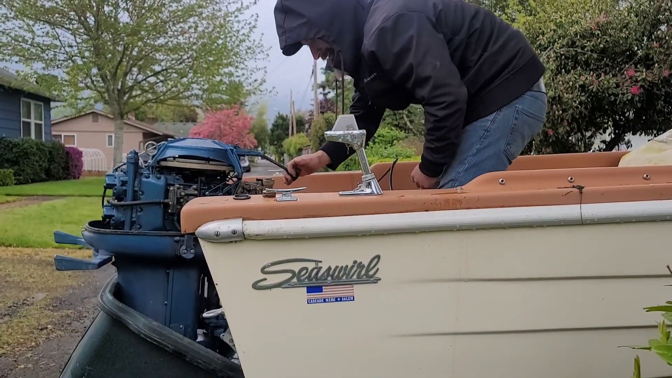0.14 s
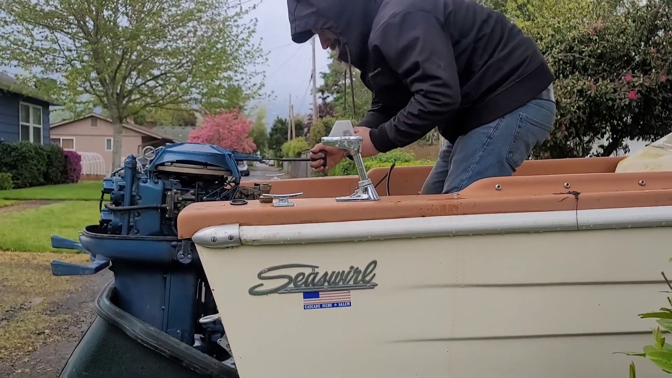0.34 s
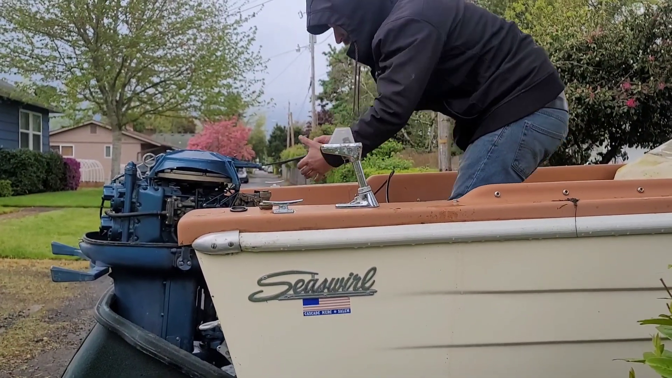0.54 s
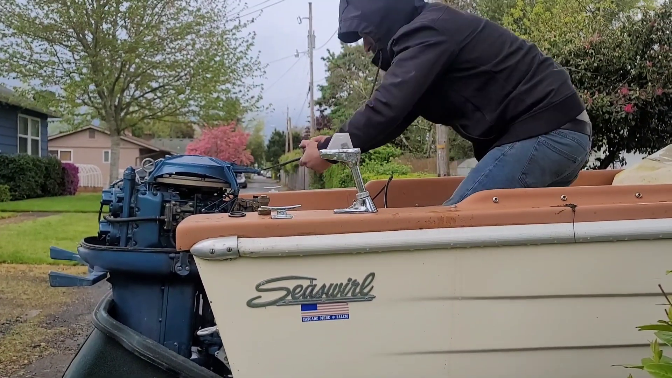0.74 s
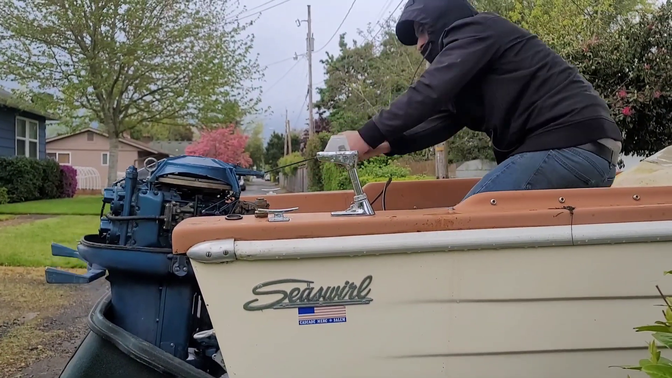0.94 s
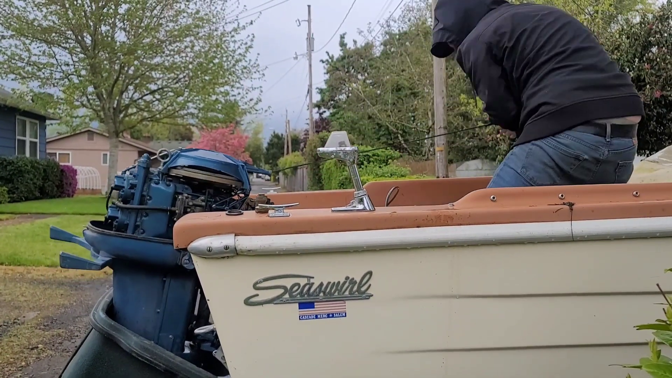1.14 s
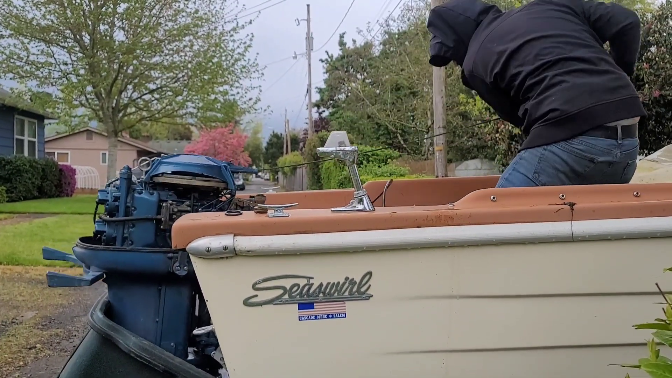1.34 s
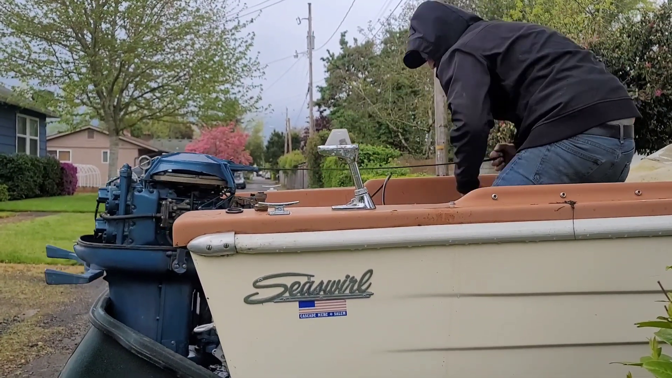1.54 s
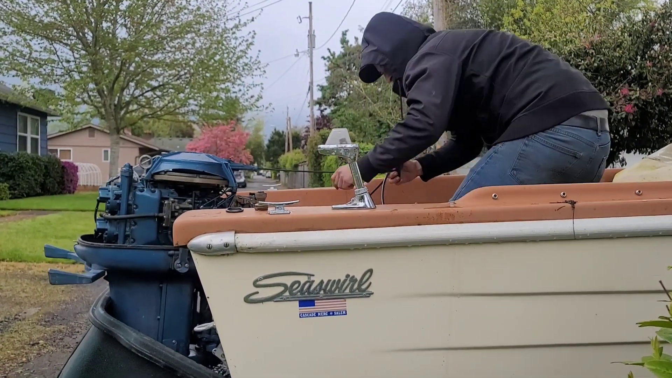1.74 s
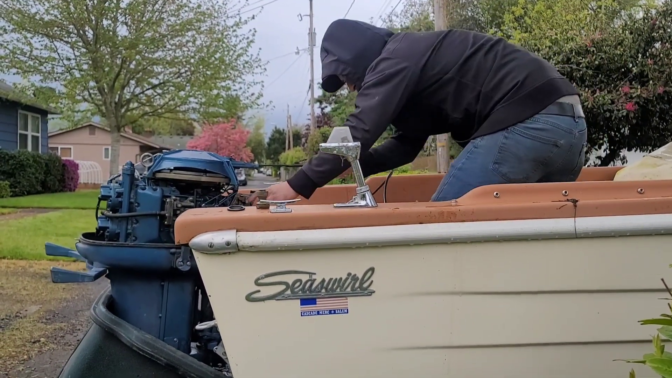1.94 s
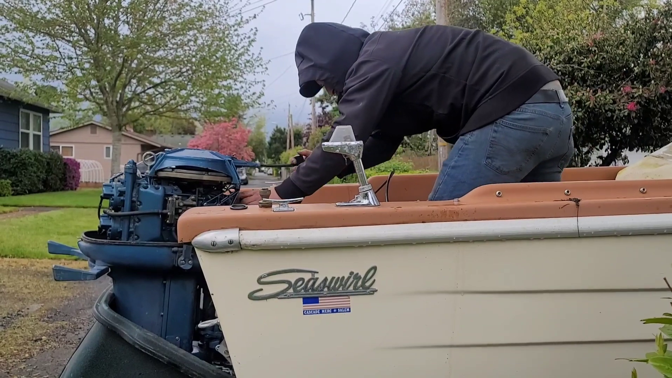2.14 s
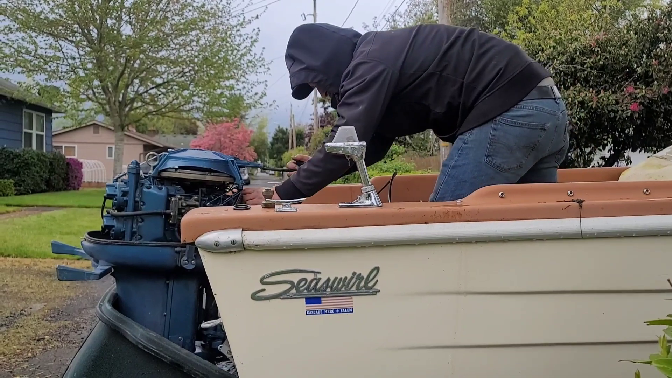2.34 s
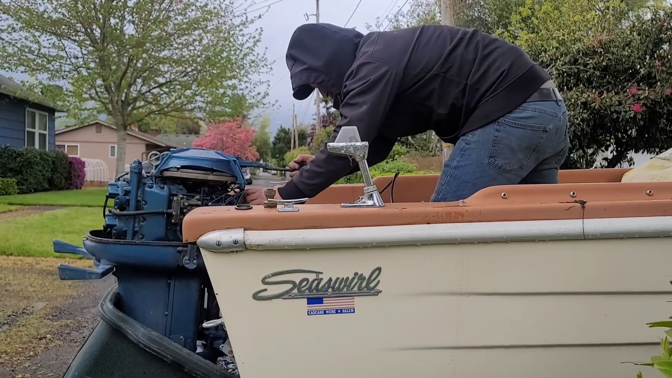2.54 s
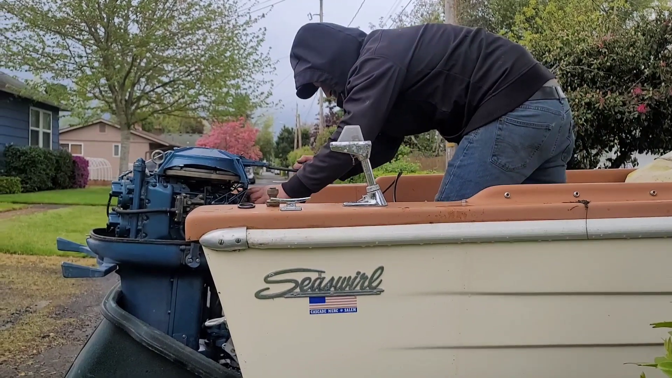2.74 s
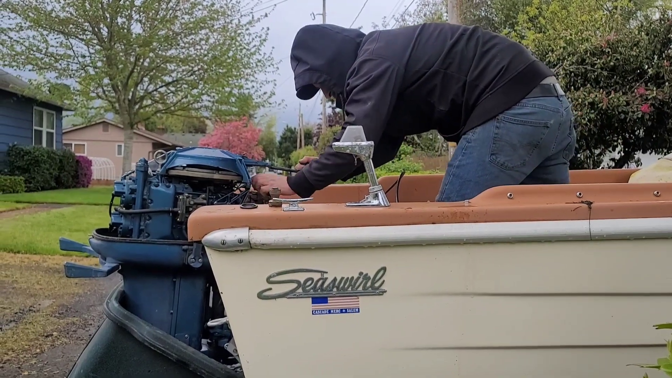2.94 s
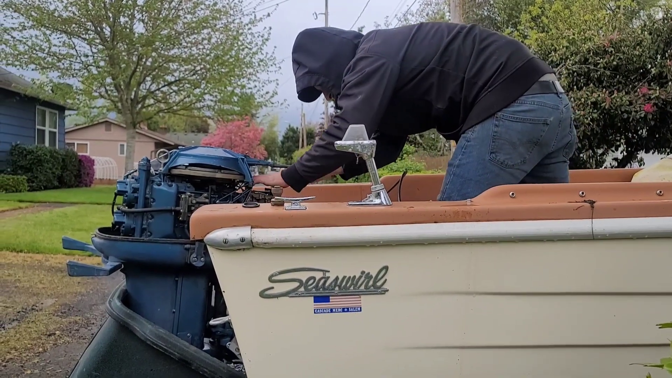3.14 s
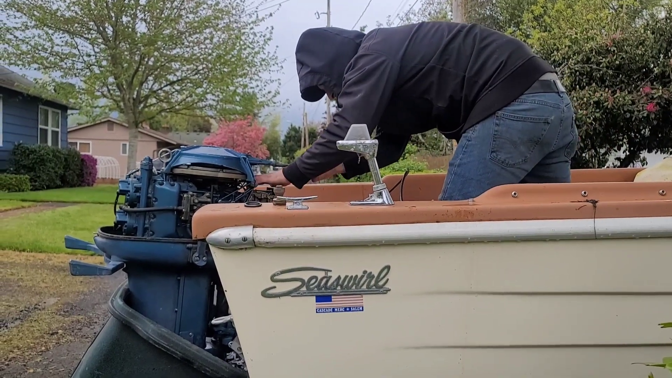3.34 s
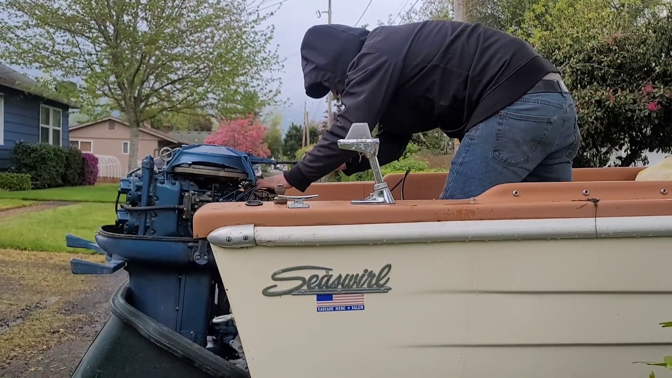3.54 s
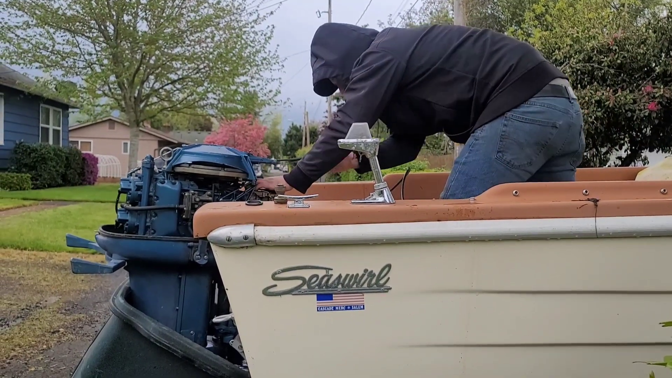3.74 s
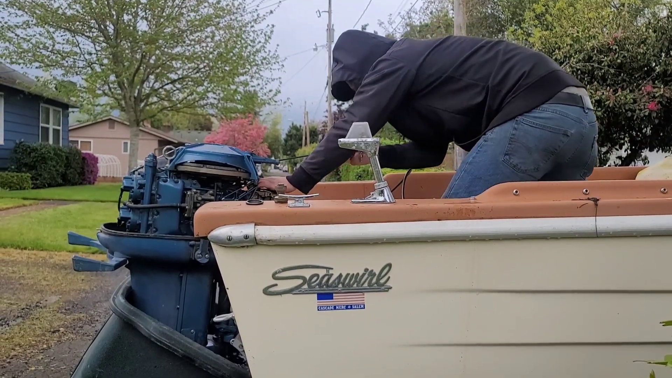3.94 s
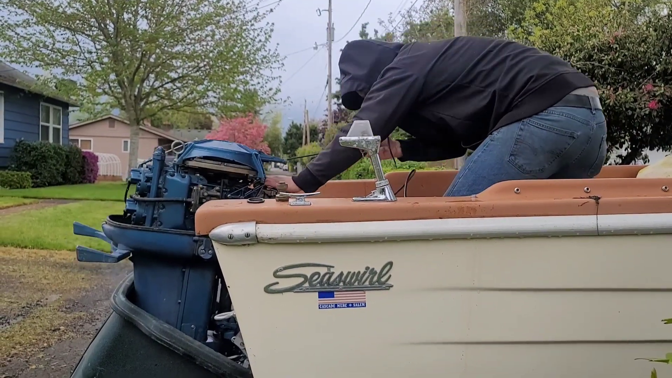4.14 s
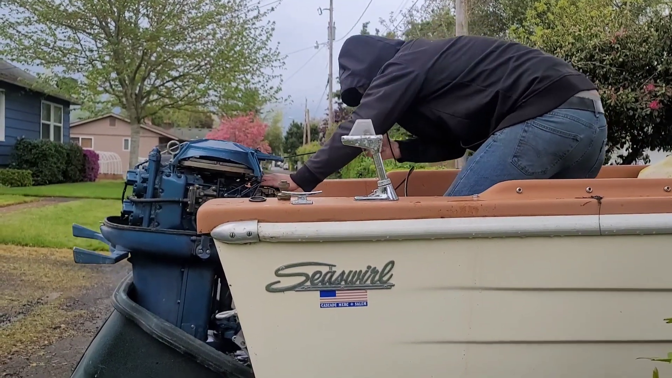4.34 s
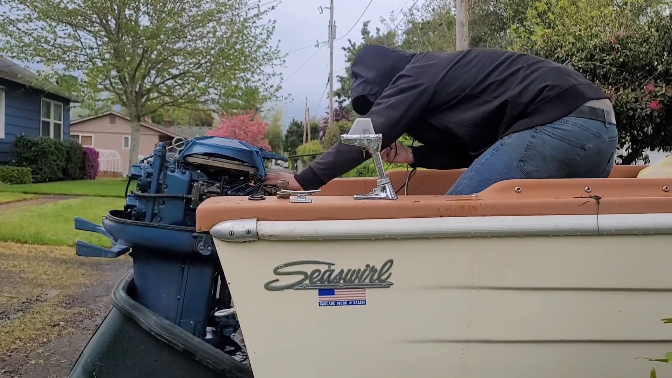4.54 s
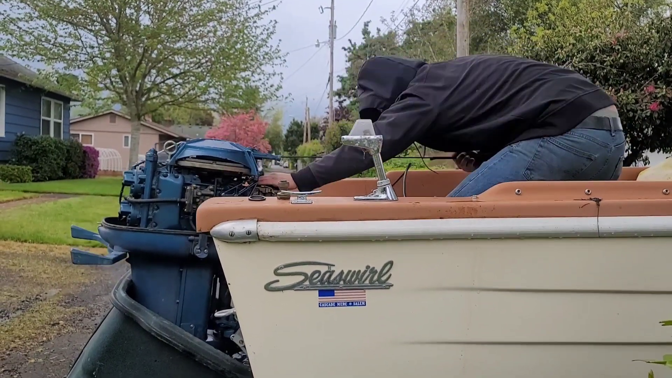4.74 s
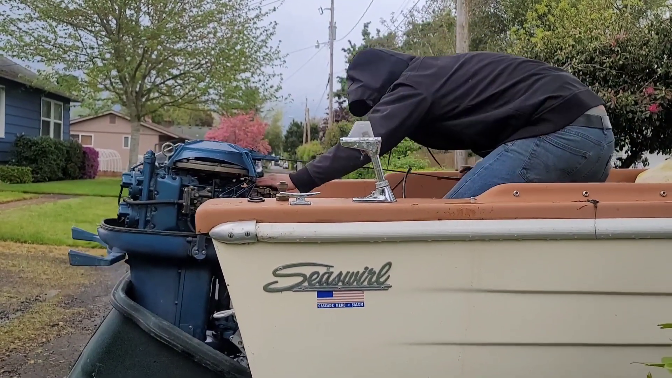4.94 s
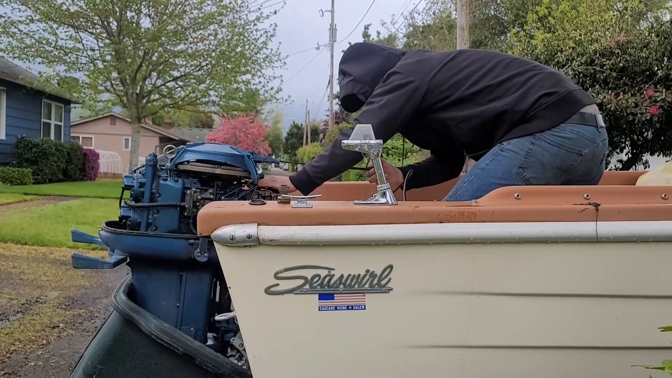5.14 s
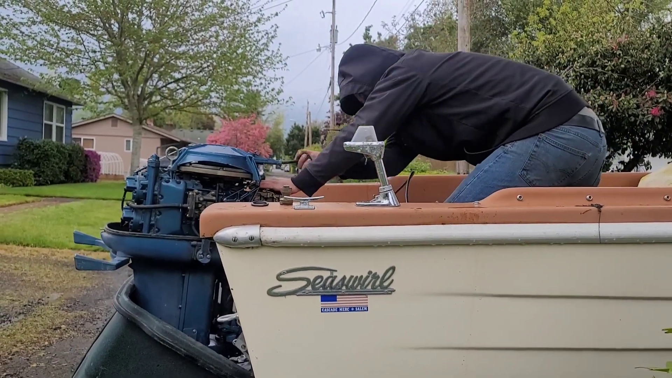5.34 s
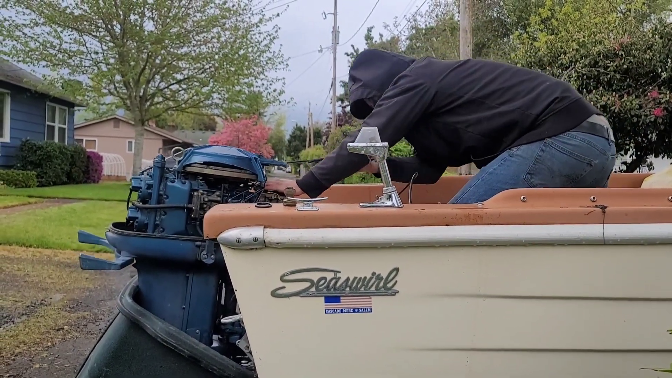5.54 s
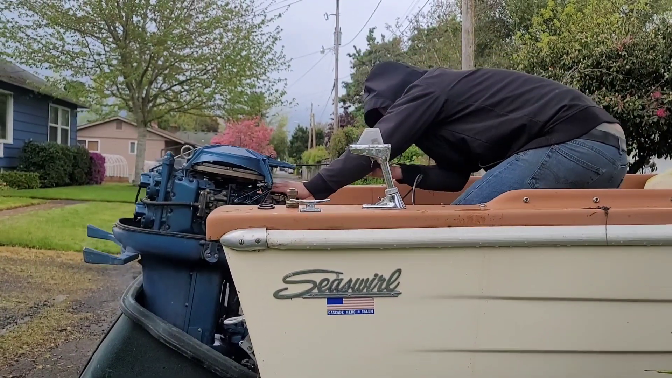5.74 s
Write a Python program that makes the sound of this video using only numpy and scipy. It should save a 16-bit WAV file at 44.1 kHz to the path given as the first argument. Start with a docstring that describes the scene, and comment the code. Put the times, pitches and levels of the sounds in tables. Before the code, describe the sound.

Close by in a quiet yard, an outboard motor is cranked once by its pull cord, rasping and rattling to a stop without firing. Scattered clicks, a tiny squeak, soft jacket rustle and a hollow clunk follow as it is handled. Near the end the starter scrapes again, more softly, with a few more metal knocks. A far bird chirps now and then over a faint traffic rumble.

```python
"""A front yard, with an old outboard motor on a boat. The starter cord is pulled hard once, the flywheel
coasts and the handle knocks home; later the starter is turned a little by hand. Each blow and scrape
excites the normal modes of the hollow housing and bare castings; the engine pumps air and shakes the
hull. Fittings tick and squeak, a jacket rustles, a distant bird sings, wind blows, and far traffic
rumbles and drones."""
import sys
import numpy as np
from scipy import signal
from scipy.fft import rfft, irfft, next_fast_len
from scipy.io import wavfile

SR = 44100
rng = np.random.default_rng(int(sys.argv[2]) if len(sys.argv) > 2 else 0)


def waveform_to_disk(signal):
    """Save audio, clipped to [-1, 1], as 16-bit WAV at the path in sys.argv[1]."""
    frames = np.transpose(np.atleast_2d(signal))
    scaled = np.clip(frames, -1, 1) * 32767
    samples = np.round(scaled).astype(np.int16)
    wavfile.write(sys.argv[1], SR, samples)


N = 254456
PAD = next_fast_len(N)
HZ = np.fft.rfftfreq(PAD, 1 / SR) + 1e-3
TIME = np.arange(N) / SR

# The hull's boom. Each row: frequency in Hz, level in dB, time to decay by 60 dB in seconds.
HULL_MODES = [(81, 0.94, 0.11)]


def amp(db):
    """Amplitude ratio: tenfold for every 20 dB."""
    return 10 ** (np.asarray(db) / 20)


def unit_rms(x):
    """Normalisation to unit mean power."""
    return x / np.sqrt(np.mean(x ** 2) + 1e-20)


def add(track, start, piece):
    """Superposition: a piece joins the track at a start in seconds."""
    i = round(start * SR)
    track[i:i + len(piece)] += piece[:N - i]


def envelope(points):
    """Amplitude envelope, linear in dB between its points and silent outside them."""
    times, levels = np.transpose(points)
    return amp(np.interp(TIME, times, levels, -200, -200))


def swells(rows, rise_db_s, fall_db_s):
    """Exponential growth and decay on either side of each held level."""
    return sum(amp(db - rise_db_s * np.maximum(start - TIME, 0)
                   - fall_db_s * np.maximum(TIME - start - hold, 0)) for start, hold, db in rows)


def drift(per_s):
    """Random modulation: straight lines between Gaussian values."""
    knots = rng.standard_normal(int(N / SR * per_s) + 2)
    return np.interp(np.linspace(0, len(knots) - 1, N), np.arange(len(knots)), knots)


def grains(per_s, spread_db):
    """Shot noise: random clicks of uneven size, at unit rms."""
    sizes = amp(spread_db * np.minimum(rng.exponential(1, N), 4)) * rng.choice([-1, 1], N)
    return unit_rms(sizes * (rng.random(N) < per_s / SR))


def band_noise(band_hz, shape):
    """Band-limited Gaussian noise at unit rms."""
    band = signal.butter(2, band_hz, "band", fs=SR, output="sos")
    return unit_rms(signal.sosfilt(band, rng.standard_normal(shape)))


def at_hz(points):
    """Interpolation of a table along a logarithmic frequency axis."""
    hz, values = np.transpose(points)
    return np.interp(np.log(HZ), np.log(hz), values)


def colour(x, spectrum):
    """Spectral shaping, with unit power gain for white noise."""
    return irfft(rfft(x, PAD) * unit_rms(amp(at_hz(spectrum))), PAD)[..., :N]


def flicker(x, spread_db, per_s):
    """Independent amplitude modulation of the octaves from 1 to 16 kHz keeps the timbre shifting."""
    spectrum, octave = rfft(x, PAD), np.log2(HZ / 1000)
    bands = [irfft(spectrum * np.clip(1 - abs(octave - k), 0, 1), PAD)[:N] for k in range(5)]
    return sum(band * amp(spread_db * drift(per_s)) for band in bands)


def ring(force, modes):
    """Modal superposition: damped resonators in parallel, neighbours opposite in sign."""
    out = 0
    for k, (hz, db, t60) in enumerate(modes):
        radius, angle = amp(-60 / (t60 * SR)), 2 * np.pi * hz / SR
        poles = [1, -2 * radius * np.cos(angle), radius ** 2]
        out = out + (-1) ** k * amp(db) * signal.lfilter([0, np.sin(angle)], poles, force + 1e-18)
    return out


def traffic():
    """Far traffic as low-frequency noise under slow amplitude modulation."""
    # Each row: time in seconds, level in dB.
    levels = [(0, -44.5), (2, -42.5), (5.77, -41.5)]
    # Each row: frequency in Hz, relative spectral density in dB.
    spectrum = [(15, -37.5), (40, -13), (80, 6.5), (105, -8), (140, -6), (190, -20.5), (300, -62)]
    return envelope(levels) * amp(0.18 * drift(4.8)) * colour(rng.standard_normal(N), spectrum)


def city_hush():
    """The far city as stationary noise, in two uncorrelated signals."""
    # Each row: frequency in Hz, relative spectral density in dB.
    spectrum = [(120, -34.5), (200, -10.5), (450, -7), (1000, -9.5), (2400, -25), (4700, -33),
                (16000, -109)]
    return amp(-51.5) * colour(rng.standard_normal((2, N)), spectrum)


def wind():
    """Turbulence: low pressure fluctuations, uncorrelated between left and right."""
    # Each row: time in seconds, level in dB.
    levels = [(0, -59), (1.2, -61), (1.7, -52.5), (4.7, -39), (5.77, -48)]
    return envelope(levels) * band_noise([20, 90], (2, N))


def bird():
    """Gliding whistles, made hoarse by random frequency and amplitude modulation."""
    # Each row: start and length in seconds, first, middle and last pitch in Hz, level in dB.
    notes = [(0, 0.016, 3220, 3110, 2770, -45.5), (0.122, 0.031, 3280, 3370, 3000, -56),
             (0.723, 0.061, 4590, 3900, 3210, -53), (0.776, 0.067, 3155, 2990, 2340, -49.5),
             (0.925, 0.034, 3500, 3980, 3920, -59), (0.994, 0.049, 2450, 3000, 3880, -51),
             (2.341, 0.1, 3300, 4090, 3060, -53.5), (2.755, 0.039, 2900, 3920, 5130, -51),
             (3.473, 0.056, 2430, 2960, 3550, -56), (3.68, 0.038, 4310, 4330, 3860, -53),
             (3.693, 0.08, 3590, 3234, 2720, -45.5), (4.48, 0.08, 3260, 3210, 2970, -57),
             (5.164, 0.046, 3240, 3090, 2830, -46), (5.692, 0.035, 4920, 4080, 3870, -53)]
    out, waver = np.zeros(N), 1 + .03 * drift(400)
    for start, length, first_hz, middle_hz, last_hz, db in notes:
        progress = np.linspace(0, 1, round(length * SR))
        glide = np.polyfit([0, .5, 1], [first_hz, middle_hz, last_hz], 2)
        pitch = np.polyval(glide, progress) * waver[round(start * SR):][:len(progress)]
        shape = np.sin(np.pi * progress) ** 0.098
        add(out, start, amp(db) * shape * np.sin(2 * np.pi * np.cumsum(pitch) / SR))
    return out * (1 + .7 * drift(400))


def housing(knocks, turning):
    """Resonance of the hollow housing, driven by impacts and by the starter's friction."""
    # Each row: frequency in Hz, level in dB, time to decay by 60 dB in seconds.
    modes = [(608.2, -7, 0.15), (661.7, 0.5, 0.071), (735.3, 9, 0.045), (824, 4, 0.04), (835.4, -3, 0.16),
             (1131, -3, 0.034), (1257, -4.5, 0.04), (1580, 5, 0.012)]
    friction = grains(per_s=1500, spread_db=2.5) * amp(2 * drift(40))
    dull_scrape = signal.lfilter([1], [1, -1.6, .7], friction)
    return ring(knocks, modes) + turning * unit_rms(ring(dull_scrape, modes))


def castings(cracks, turning):
    """Impact and friction on bare metal: a broad rasp, and modes whose share shifts with the contact."""
    # Cord and pawls skid. Each row: time of peak and hold in seconds, level in dB.
    skids = [(0.438, 0.0023, -25.5), (1.093, 0.018, -34.5), (1.177, 0.0093, -13), (1.275, 0.07, -34),
             (1.376, 0.035, -26.5), (1.556, 0.007, -39.5), (4.69, 0.061, -39.5), (4.848, 0.025, -40),
             (4.972, 0.02, -38), (5.36, 0.0027, -43.5)]
    # Each row: frequency in Hz, relative spectral density in dB.
    rasp_spectrum = [(600, -28), (1100, -1.5), (2200, -5.5), (3300, -3.5), (5200, -18.5), (6700, -5),
                     (9000, -21), (13000, -19), (16000, -21.5)]
    # Each row: frequency in Hz, relative level in dB.
    modes = [(1570, 1.5), (2850, -3.5), (3310, -5), (3840, -7.5), (4120, -4.5), (5520, -7), (6150, -7.5),
             (6750, -3.5)]
    sliding = amp(-15) * turning + swells(skids, rise_db_s=905.5, fall_db_s=679.5)
    force = cracks + sliding * grains(per_s=2500, spread_db=4.4) * amp(3.5 * drift(90))
    out = flicker(colour(force, rasp_spectrum), spread_db=5.4, per_s=18)
    for hz, db in modes:
        coupling = amp(db - 34.5 + 7.5 * drift(16))
        out = out + ring(force * coupling, [(hz, 0, 56 / hz)])  # dies in 56 cycles
    return out


def blows():
    """Impact excitation: the harder the contact, the wider its spectrum; soft ones bend only panels."""
    # Each row: start in seconds, housing level in dB, castings level in dB.
    impacts = [(0.439, -15.5, -18), (1.114, -42, -14), (1.256, -50, -7.5), (1.314, -30, -18.5),
               (1.347, -44, -17), (1.449, -24.5, -58), (1.493, -44.5, -22.5), (1.62, -32.5, -15.5),
               (1.761, -41, -16.5), (1.822, -25.5, -33.5), (1.861, -31.5, -36.5), (1.924, -37, -16),
               (2.053, -40, -79), (3.785, -52.5, -29), (3.856, -19.5, -18), (4.514, -49, -47),
               (4.699, -45, -22.5), (4.854, -22.5, -16), (4.975, -49, -23), (5.06, -53, -28),
               (5.224, -36.5, -13.5), (5.303, -40.5, -35), (5.358, -33, -43), (5.503, -54, -29.5),
               (5.532, -16.5, -15.5), (5.546, -21.5, -25)]
    knocks, cracks, snaps, thud_gain = np.zeros((4, N))
    t = np.arange(3000) / SR
    for start, housing_db, castings_db in impacts:
        chatter = rng.standard_normal((2, len(t))) * np.exp(-t / 0.0074)
        flex_hz = 680 * rng.uniform(.88, 1.12)  # each blow lands elsewhere
        flex = 0.038 * np.cos(2 * np.pi * flex_hz * t) * np.exp(-t / 0.0033) * np.minimum(t / 0.0026, 1)
        sharp = 0.16 * chatter[0] + (t == 0)
        hardness = amp(-0.5 + 0.45 * (castings_db - housing_db))
        snap = 0.24 * np.diff(chatter[0], prepend=0) * np.exp(-t / 0.0087)  # first touch is brightest
        add(knocks, start, amp(housing_db) * (flex + hardness * sharp))
        add(cracks, start, amp(castings_db) * chatter[1] * np.minimum(t / 0.0014, 1))
        add(snaps, start, amp(castings_db) * snap * np.minimum(t / 0.0015, 1))
        add(thud_gain, start, amp(housing_db - 15.5) * np.exp(-t / 0.028))
    return knocks, cracks, snaps, thud_gain


def motor():
    """Forced vibration: the starter scrapes and knocks; the engine pumps air and shakes the hull."""
    # One list for each turn of the starter. Each row: time in seconds, scrape level in dB.
    turns = [
        [(0.3, -54.5), (0.39, -49), (0.44, -32)],
        [(1.075, -43.5), (1.13, -15), (1.2, -28), (1.27, -19), (1.36, -24), (1.46, -36), (1.67, -26.5),
         (1.9, -41), (2.1, -50)],
        [(4.67, -54), (4.7, -27.5), (4.8, -36.5), (4.92, -34.5), (5.03, -50), (5.12, -35.5), (5.28, -34.5),
         (5.4, -55)],
    ]
    # The engine turns over. Each row: time of greatest speed in seconds, level in dB.
    pulls = [(1.202, -26), (4.817, -43)]
    knocks, cracks, snaps, thud_gain = blows()
    turning = sum(envelope(turn) for turn in turns)
    body = housing(knocks, turning) + castings(cracks, turning) + snaps
    chuff = band_noise([140, 480], N)  # crankcase air; also the dull thud under each blow
    shake = amp(2) * unit_rms(ring(rng.standard_normal(N), HULL_MODES))
    pumping = swells([(peak, 0.075, db) for peak, db in pulls], rise_db_s=142.5, fall_db_s=40.5)
    return body + thud_gain * chuff + pumping * (chuff + shake)


def hull_thumps():
    """Free vibration: the hull booms after each soft kick of the engine's compression."""
    # Each row: start in seconds, level in dB.
    kicks = [(0.623, -29.5), (1.183, 0.5), (1.23, -11.5), (1.451, -25), (1.572, -20), (2.872, -24),
             (4.852, -31)]
    push = np.zeros(N)
    for start, db in kicks:
        add(push, start, amp(db) * np.hanning(200) / 100)
    return ring(push, HULL_MODES)


def drone():
    """Narrow-band noise, heard as a far, wavering tone that comes and goes."""
    # Each row: time of peak and hold in seconds, level in dB.
    levels = [(1.4, 2.5, -51.5)]
    tone = ring(rng.standard_normal(N), [(133, 0, .5)])
    return swells(levels, rise_db_s=16, fall_db_s=16) * unit_rms(tone)


def jacket():
    """Friction noise of nylon: clumps of fine grains, briefly louder where a crease snaps."""
    # The sleeve rubs. Each row: time of peak and hold in seconds, level in dB.
    rubs = [(1.95, 0.16, -54.5), (2.84, 0.15, -48.5), (3.95, 0.19, -49), (4.2, 0.047, -65)]
    # Each row: frequency in Hz, relative spectral density in dB.
    spectrum = [(900, -28.5), (2000, -15.5), (4000, -11.5), (9000, -16), (16000, -20)]
    creases = signal.lfilter([1], [1, -.99], grains(per_s=60, spread_db=2.5) ** 2) ** .5
    rubbing = amp(-80) + swells(rubs, rise_db_s=611.5, fall_db_s=103)
    clumps = amp(drift(27)) * (1 + 0.081 * creases) * rubbing
    sides = (colour(grains(per_s=9000, spread_db=1.7) * clumps, spectrum) for _ in range(2))
    return np.array([flicker(side, spread_db=4.5, per_s=20) for side in sides])


def ticks():
    """Cord, fingers and fittings tap: noise bursts excite heavily damped resonances; high ones snap."""
    # Each row: start in seconds, level in dB, pitch in Hz.
    taps = [(2.009, -32, 8500), (2.1244, -26.5, 2540), (2.245, -40, 6500), (2.2814, -27, 3070),
            (2.8225, -36, 8600), (2.8785, -30.5, 5330), (2.9404, -18, 2200), (3.003, -24.5, 3660),
            (3.0953, -32.5, 6050), (3.381, -38, 6560), (3.594, -44.5, 3740), (3.708, -39, 6850),
            (3.859, -10.5, 1360), (4.112, -26, 2800), (4.191, -33, 3730), (4.2219, -24.5, 5900),
            (4.296, -30, 4880), (4.946, -48, 8000), (5.014, -33, 3000), (5.121, -34, 8900)]
    out, t = np.zeros(N), np.arange(1500) / SR
    for start, db, hz in taps:
        burst = rng.standard_normal(len(t)) * np.exp(-t / 0.0031)
        bright = np.diff(burst, prepend=0)
        tone = ring(bright, [(hz, 0, 9 / hz)])  # dies in 9 cycles
        snap = 0.15 * max(hz / 9000 - .15, 0) * bright
        add(out, start, amp(db) * (tone / np.max(np.abs(tone)) + snap))
    return out


def squeaks():
    """A fitting squeaks: damped oscillations that sag in pitch as they die."""
    # Each row: start in seconds, initial pitch in Hz, level in dB.
    chirps = [(2.5092, 1590, -31.5), (2.5723, 1330, -15.5), (3.721, 1470, -34.5)]
    out, t = np.zeros(N), np.arange(2500) / SR
    shape = np.minimum(t / 0.003, 1) * np.exp(-t / 0.0039)
    for start, hz, db in chirps:
        pitch = hz * (1 - 11 * t)
        add(out, start, amp(db) * shape * np.sin(2 * np.pi * np.cumsum(pitch) / SR))
    return out


def yard(x, t60, wet_db):
    """Scattering from houses and trees: an exponential tail of echoes, different on each side."""
    t = np.arange(round(t60 * SR)) / SR
    tail = rng.standard_normal((2, len(t))) * amp(-60 * t / t60) * np.minimum(t / 0.00025, 1)
    tail /= np.sqrt(np.sum(tail ** 2, axis=1, keepdims=True))
    return amp(wet_db) * signal.fftconvolve(x[None], tail, axes=1)[:, :N]


def stereo(x, lag_radians):
    """Path difference: the right side lags the left by a phase that depends on direction."""
    return np.array([x, irfft(rfft(x, PAD) * np.exp(-1j * lag_radians), PAD)[:N]])


def scene():
    """Superposition of the near boat and jacket, the far street and bird, echoes and wind."""
    # Arrival from the street. Each row: frequency in Hz, lag of the right side in radians.
    street_lag = [(80, 0.41), (260, 0.86), (780, 3.09), (1550, 4.64), (2700, 6.9), (16000, 21)]
    motor_lag_s = 0.00022
    near = motor() + ticks() + squeaks()
    song, rumble, gusts, hush = bird(), traffic(), wind(), city_hush()
    treble = signal.sosfilt(signal.butter(2, 1500, "high", fs=SR, output="sos"), near)
    boat = stereo(near + hull_thumps(), 2 * np.pi * HZ * motor_lag_s + 0.061)
    echoes = yard(treble + 0.24 * near, t60=0.3, wet_db=-9) + yard(treble, t60=0.064, wet_db=-0.5)
    street = stereo(rumble + drone() + hush[0], at_hz(street_lag))
    street += 0.74 * hush[1] * [[1], [-1]]  # antiphase noise widens the hush
    far_bird = 0.7 * song + yard(song, t60=.28, wet_db=1.5)
    return boat + echoes + street + far_bird + jacket() + gusts


def record(dry):
    """Each side has its own frequency response; saturation rounds the peaks, a low-pass cuts the top."""
    # Each row: frequency in Hz, level of left over right in dB.
    balance = [(60, 2), (290, 0.5), (640, 6.5), (1410, 1), (3100, 3), (6820, 8), (15000, 0.5)]
    tilt = amp(at_hz(balance) / 2)
    tilted = irfft(rfft(dry, PAD) * [tilt, 1 / tilt], PAD)[:, :N]
    rounded = .9 * np.tanh(tilted / .9)
    return signal.sosfilt(signal.ellip(10, .5, 60, 15800, fs=SR, output="sos"), rounded)


dry = scene()
out = record(dry)
waveform_to_disk(out)
```